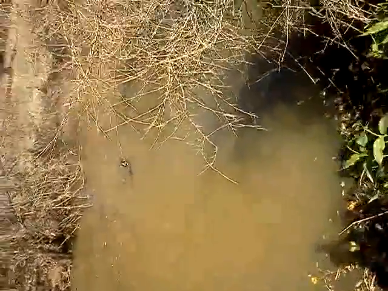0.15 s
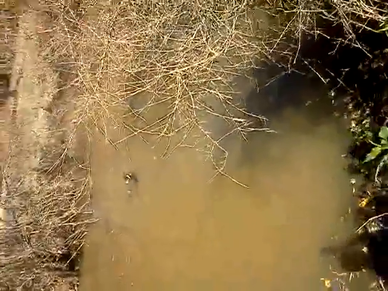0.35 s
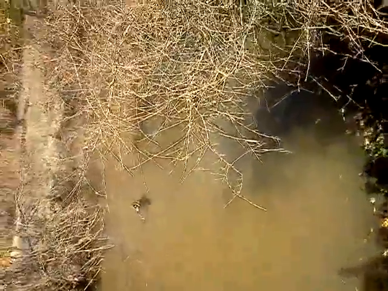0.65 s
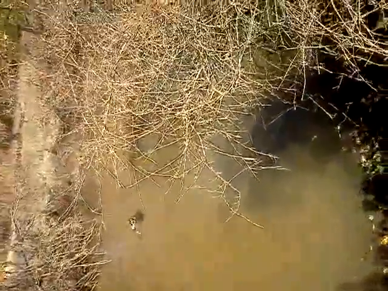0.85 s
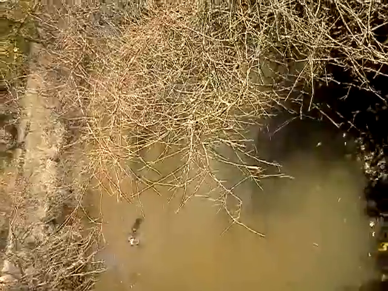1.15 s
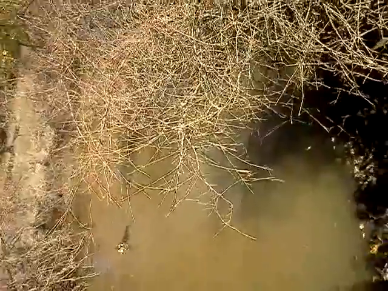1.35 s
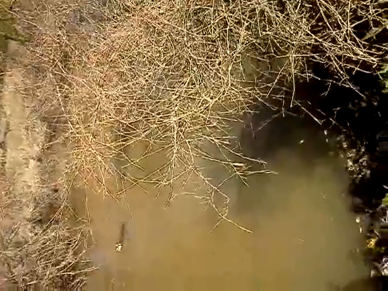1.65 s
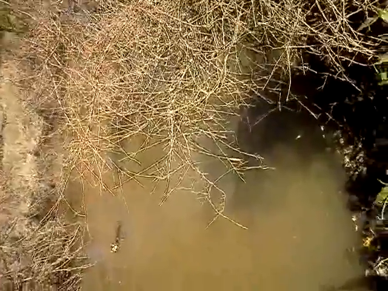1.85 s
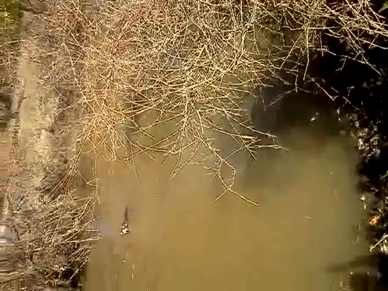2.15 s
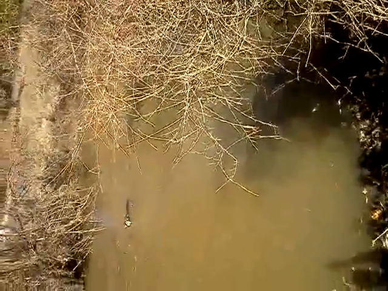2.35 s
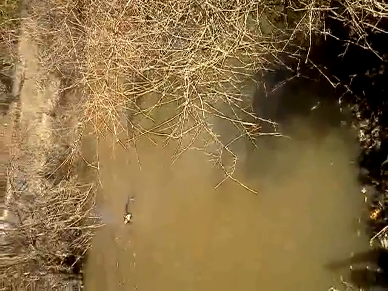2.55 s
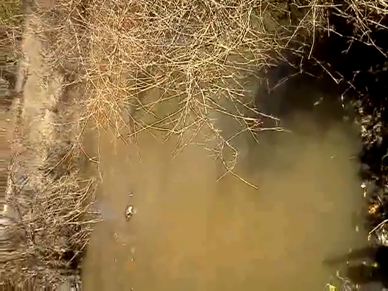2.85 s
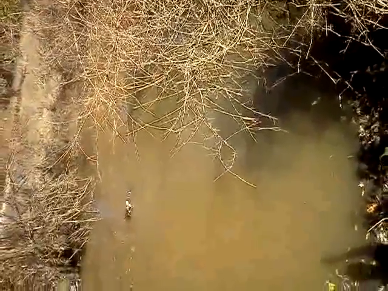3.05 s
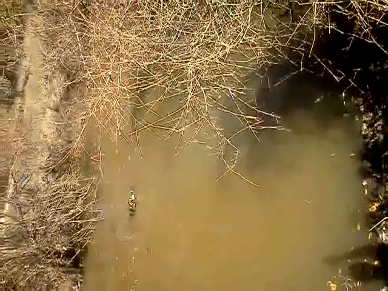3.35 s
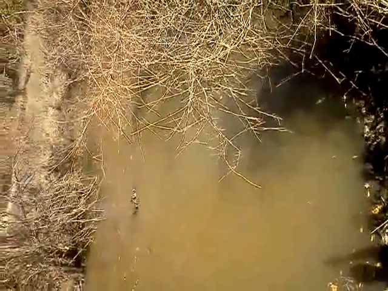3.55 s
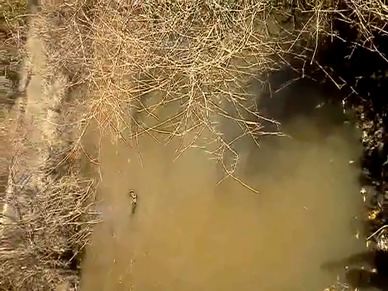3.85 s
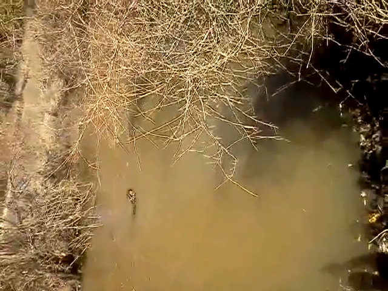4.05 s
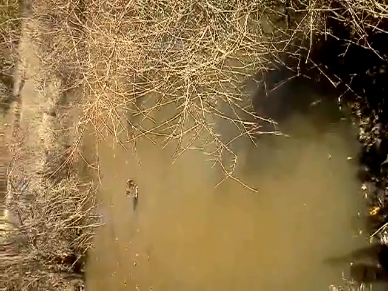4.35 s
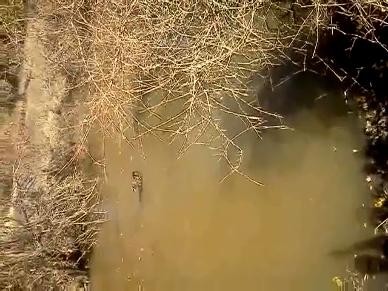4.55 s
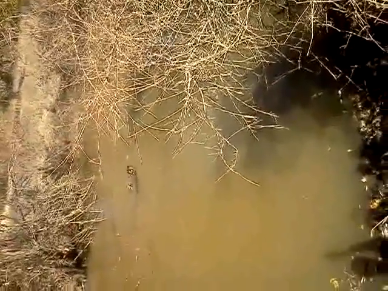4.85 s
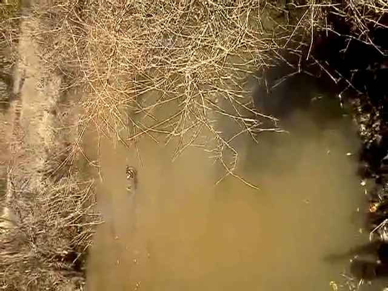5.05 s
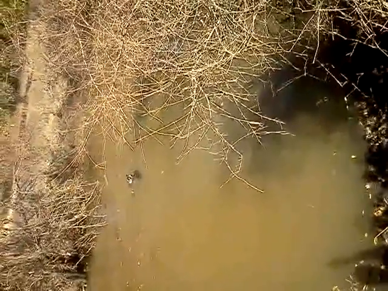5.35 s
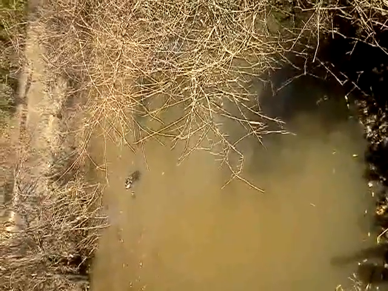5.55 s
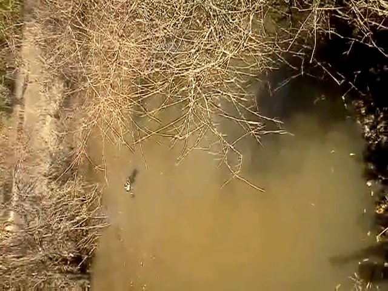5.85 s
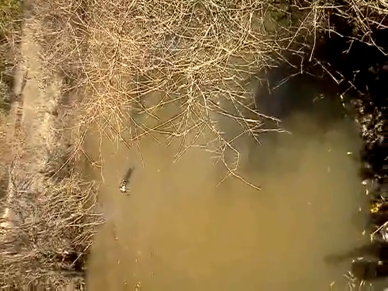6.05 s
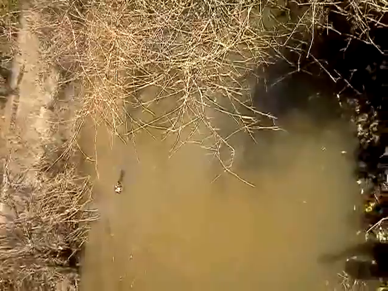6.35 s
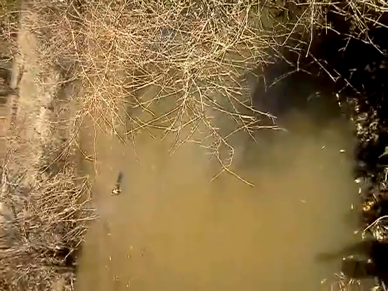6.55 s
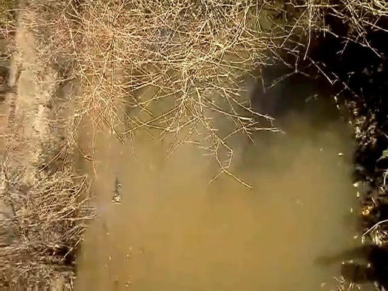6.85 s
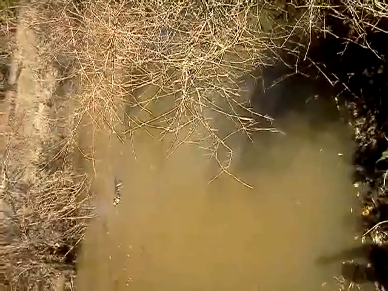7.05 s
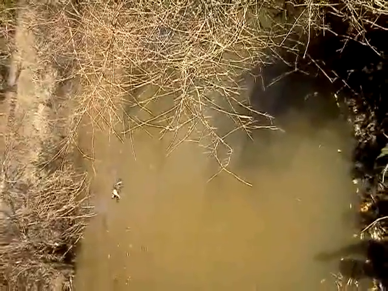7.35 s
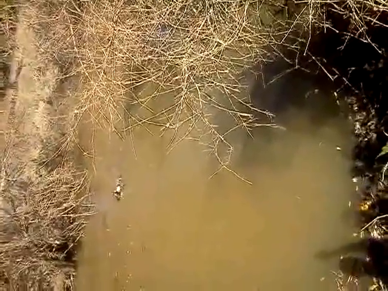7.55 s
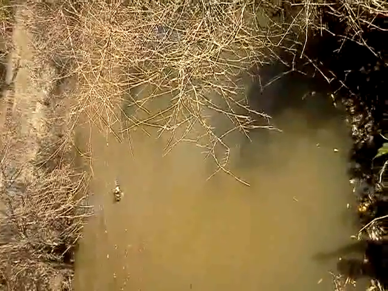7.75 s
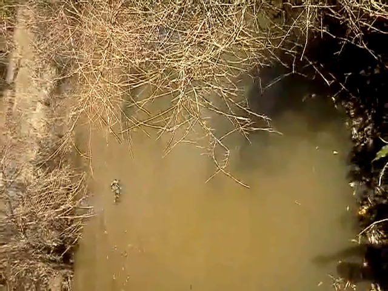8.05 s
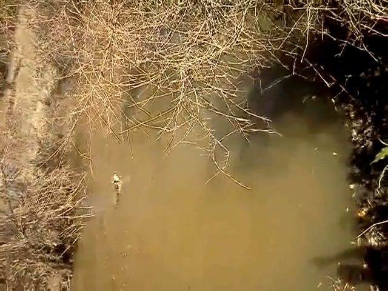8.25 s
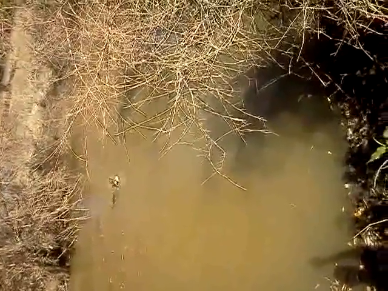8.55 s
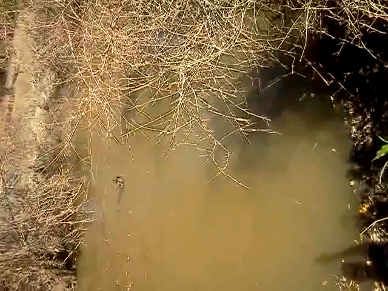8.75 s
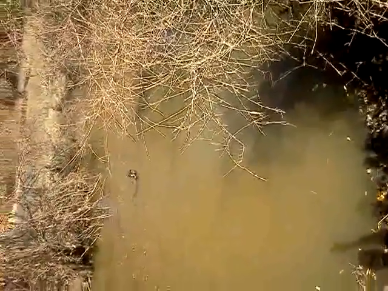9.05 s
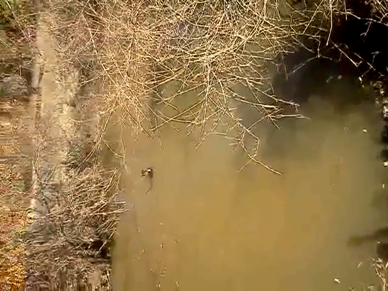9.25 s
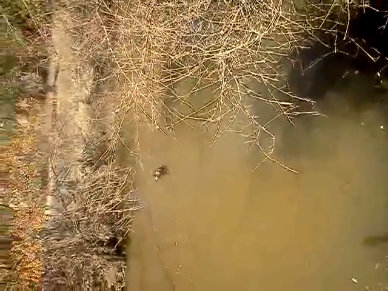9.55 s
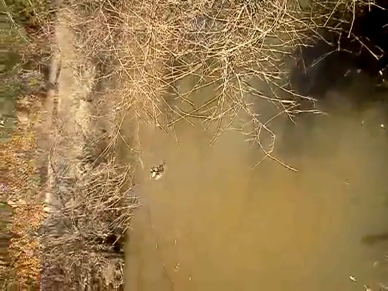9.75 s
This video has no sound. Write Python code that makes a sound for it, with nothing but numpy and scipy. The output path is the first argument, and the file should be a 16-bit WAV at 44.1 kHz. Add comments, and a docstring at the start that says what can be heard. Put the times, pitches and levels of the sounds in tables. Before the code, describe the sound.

Sharp pitched dog yips echo outdoors over a faint creek wash, amid early dry-litter crackle and dull finger bumps on the camera.

```python
"""On the wooded banks above a slow creek, a husky yelps and whines close by, and the banks ring after its cries.
The dog's voice mixes clear vocal-fold tones with torn, noisy rasps, shaped by a mouth that opens and shuts.
Dry twigs snap as short noise bursts, leaves rustle as many tiny cracks, and fingers thump a camera body.
The creek is patchy filtered noise far below. Loud cries are flattened by a fast limiter and rounded clipping."""
import sys
import numpy as np
from scipy import signal
from scipy.fft import rfft, irfft, next_fast_len
from scipy.io import wavfile
from scipy.ndimage import uniform_filter1d

SR = 44100
rng = np.random.default_rng(int(sys.argv[2]) if len(sys.argv) > 2 else 0)


def waveform_to_disk(signal):
    """Save audio, clipped to [-1, 1], as 16-bit WAV at the path in sys.argv[1]."""
    frames = np.transpose(np.atleast_2d(signal))
    scaled = np.clip(frames, -1, 1) * 32767
    samples = np.round(scaled).astype(np.int16)
    wavfile.write(sys.argv[1], SR, samples)


N = 436590
TIME = np.arange(N) / SR  # seconds

# tone colour of breaking dry litter, for twigs and leaves: (f/Hz, level/dB)
TWIG = [(200, -34.5), (700, -17.5), (1400, -3.5), (2600, 2), (3400, -13.5), (5000, -28)]


def gain_of(db):
    """Turns decibels into an amplitude factor."""
    return 10 ** (np.asarray(db) / 20)


def evened(x):
    """Scales a sound to an rms (average strength) of 1."""
    return x / np.sqrt(np.mean(x ** 2) + 1e-20)


def steadied(x, size=500):
    """Holds the short-time rms near 1, averaging twice over size samples."""
    power = uniform_filter1d(uniform_filter1d(x ** 2, size), size)
    return x / np.sqrt(abs(power) + 1e-12)


def read(points, hz):
    """Reads a table between its points, on a logarithmic frequency axis."""
    f, value = np.transpose(points)
    return np.interp(np.log(hz + 1), np.log(f + 1), value)


def coloured(x, points):
    """Changes the tone colour by a table of (f/Hz, level/dB)."""
    size = next_fast_len(len(x) + 2048)
    gain = gain_of(read(points, np.fft.rfftfreq(size, 1 / SR)))
    return irfft(rfft(x, size) * gain, size)[:len(x)]


def wander(size, rate_hz):
    """Smooth random drift of rms 1; changes faster than rate_hz are strongly weakened."""
    hz = np.fft.rfftfreq(size, 1 / SR)
    spectrum = rfft(rng.standard_normal(size)) / (1 + (hz / rate_hz) ** 4)
    return evened(irfft(spectrum, size))


def add(mix, s, sound):
    """Mixes a sound in, starting at s seconds."""
    part = mix[max(round(s * SR), 0):][:len(sound)]
    part += sound[:len(part)]


def step(t, at_s, ease_s):
    """Changes smoothly from 0 to 1 around at_s."""
    return .5 + .5 * np.tanh((t - at_s) / ease_s)


def resonate(x, hz, width_hz):
    """A steep resonance that follows the curve hz: shift its pitch to zero, smooth twice, shift back."""
    turn = np.exp(2j * np.pi * np.cumsum(hz * np.ones(len(x))) / SR)
    r = np.exp(-np.pi * width_hz / SR)
    smooth = signal.lfilter([(1 - r) ** 2], [1, -2 * r, r * r], x / turn + 1e-18)
    return 2 * (turn * smooth).real


def creek(patchy_db=2, swell_db=2.0, level_db=-43):
    """A far wash of water: noise whose strength drifts in patches over time and frequency."""
    # colour of the water: (f/Hz, level/dB)
    water_colour = [(30, -26), (100, -12.5), (220, -7.5), (400, 2.5), (700, -2.5), (1300, -4.5), (2000, 0),
                    (2700, 2), (3400, -10), (4200, -19.5)]
    z = signal.stft(rng.standard_normal(N), nperseg=1024)[2]
    patches = uniform_filter1d(rng.standard_normal(z.shape), size=7, axis=0)  # across frequency
    patches = evened(uniform_filter1d(patches, size=8, axis=1))  # across time
    wash = signal.istft(z * gain_of(patchy_db * patches), nperseg=1024)[1][:N]
    return evened(coloured(wash, water_colour)) * gain_of(level_db + swell_db * wander(N, rate_hz=9.5))


def banks(x, tail_db=-16.0, build_s=0.0086, clumpy_db=3):
    """A few distinct echoes, and the scatter of trunks and branches, which arrives in clumps."""
    # echoes from ground and banks: (delay t/s, level/dB)
    echoes = [(.012, -34), (.041, -15), (.052, -17.5), (.098, -21.5), (.135, -25), (.19, -34), (.26, -35.5)]
    # time in which the scatter falls by 60 dB: (f/Hz, t/s)
    wood_decay = [(250, 0.18), (700, 1.24), (1400, 1.415), (2600, 1.05), (4000, 0.99)]
    # colour of the scatter at its start: (f/Hz, level/dB)
    wood_colour = [(200, -32.5), (750, -2), (1400, 0), (2500, 6.5), (4000, -0.5)]
    t = np.arange(int(1.5 * SR)) / SR
    hz, age, z = signal.stft(rng.standard_normal(len(t)), SR, nperseg=256)
    fading_db = read(wood_colour, hz)[:, None] - 60 * age / read(wood_decay, hz)[:, None]
    tail = signal.istft(z * gain_of(fading_db), SR, nperseg=256)[1][:len(t)]
    tail = tail * (1 - np.exp(-t / build_s))
    tail = tail * gain_of(clumpy_db * wander(len(t), rate_hz=80))
    response = gain_of(tail_db) * tail / np.linalg.norm(tail)
    for delay, db in echoes:
        add(response, delay, gain_of([db]))
    return signal.fftconvolve(x, response)[:N]


def leaves(crackles_per_s=5000, spread_db=4.0, still_db=-70):
    """Many tiny cracks of dry litter, swelling and dying with each scuff and never quite still."""
    # scuffs in the leaves: (loudest at t/s, rise t/s, fall t/s, level/dB)
    scuff_table = [(.12, 0.15, 0.14, -29), (.375, 0.033, 0.026, -48), (.49, 0.014, 0.027, -30.5),
                   (0.751, 0.081, .02, -31), (2.235, 0.043, 0.052, -31.5), (2.3, 0.058, .02, -29)]
    happens = rng.random(N) < crackles_per_s / SR
    sizes = gain_of(spread_db * np.minimum(rng.exponential(1, N), 4))
    grains = happens * rng.standard_normal(N) * sizes
    scuffs = np.zeros(N)
    for s, rise_s, fall_s, db in scuff_table:
        distance = np.maximum((s - TIME) / rise_s, (TIME - s) / fall_s)
        scuffs += gain_of(db) * np.exp(-distance)
    return evened(coloured(grains, TWIG)) * (gain_of(still_db) + scuffs)


def twigs(snap_s=0.0016, splinter_db=-17, splinter_s=0.014):
    """Each dry twig gives a sharp crack of noise with a brief, weaker splintering behind it."""
    # snaps: (t/s, peak level/dB)
    snaps = [(0.1181, -1), (0.123, -19), (.159, -13), (0.179, -28), (0.195, -8), (0.205, -17.5),
             (0.372, -16), (0.407, -23.5), (0.695, -8), (.721, -14), (0.746, -10), (2.151, -13.5),
             (9.836, -11)]
    out, t = np.zeros(N), np.arange(2000) / SR
    fade = np.exp(-t / snap_s) + gain_of(splinter_db) * np.exp(-t / splinter_s)
    for (s, db), noise in zip(snaps, rng.standard_normal((len(snaps), len(t)))):
        crack = coloured(noise * fade, TWIG)
        add(out, s, gain_of(db) * crack / abs(crack).max())
    return out


def thump(hz, rise_s, sag=0.43, sag_s=0.0013):
    """The damped case rings briefly, sagging in pitch as the finger settles."""
    t = np.arange(1500) / SR
    turns = np.cumsum(hz * (0.95 + sag * np.exp(-t / sag_s))) / SR
    return (t / rise_s) * np.exp(1 - t / rise_s) * np.sin(2 * np.pi * turns)


def fingers(rise_s=0.0024, harden=0.024, creak_db=-14, lag_s=.002, count=4, fidgets_per_s=8, fidget_db=-33):
    """Each slip of the grip thumps the case, the harder the shorter; weaker and faint slips fall at random."""
    # bumps, before thump() bends the pitch and the case colours it: (t/s, level/dB, ring f/Hz)
    bumps = [(0.189, -27, 257), (0.353, -28, 206), (1.53, -23.5, 193), (1.788, -32.5, 240),
             (1.95, -28.5, 266), (2.484, -26, 237), (2.541, -14.5, 278), (2.594, -12.5, 326),
             (2.609, -16, 270), (2.646, -16, 279), (2.673, -18.5, 333), (2.783, -31.5, 248),
             (2.961, -26, 240), (3.001, -11.5, 336), (3.05, -16, 269), (3.076, -20, 273),
             (3.663, -14.5, 261), (3.682, -14.5, 294), (3.701, -14, 300), (3.737, -9, 415),
             (3.75, -14.5, 277), (3.821, -15.5, 306), (3.879, -19, 297), (3.9, -14, 352),
             (3.919, -15.5, 316), (3.958, -21.5, 298), (4.037, -15, 363), (4.065, -17, 268),
             (4.507, -19.5, 363), (4.551, -8, 318), (4.633, -18, 230), (4.656, -9.5, 331),
             (4.675, -19.5, 257), (4.791, -13.5, 281), (4.818, -8.5, 313), (4.861, -10, 416),
             (4.877, -22.5, 221), (4.955, -15.5, 324), (5.065, -23, 211)]
    out = np.zeros(N)
    for (s, db, hz), chance in zip(bumps, rng.random((len(bumps), count, 3))):
        add(out, s + lag_s, gain_of(db) * thump(hz, rise_s * np.exp(-harden * (db + 34.5))))
        for when, size, pitch in chance:  # weaker slips just after
            creak = thump(220 + 240 * pitch, rise_s * (1.3 - .7 * pitch))
            add(out, s + 0.00511 + 0.031 * when, gain_of(db + creak_db) * (0.82 + size) * creak)
    for s in np.arange(1.6, 5.25, 1 / fidgets_per_s):  # seconds when the grip is restless
        when, size, pitch = rng.random(3)
        fidget = thump(230 + 90 * pitch, rise_s)
        add(out, s + when / fidgets_per_s, gain_of(fidget_db) * (.5 + size) * fidget)
    # colour of the case: (f/Hz, level/dB)
    return coloured(out, [(60, 0.0), (130, -10.5), (220, 1), (550, -1.0), (900, 3.5), (1500, -14.5)])


def gesture(start, length, swell_s, level_db, change_db, first_hz, turn_hz, last_hz, climb_s,
            opens_s, shuts_s, first_rough, last_rough, shut_db, open_db):
    """One cry: effort swells, holds and lets go, the pitch bends to a turning point, the mouth opens and shuts."""
    # the voice cracks into another register: (t/s, length t/s, pitch ratio)
    cracks = [(1.013, .027, 1.15), (1.361, .05, 1.21), (3.146, .05, 1.1), (4.11, .044, 1.08),
              (5.563, .024, 1.13), (6.646, .038, 1.293), (6.706, 0.0261, 1.09), (7.295, 0.044, 1.2),
              (8.235, 0.018, 1.335), (8.301, 0.016, 0.99)]
    t = np.arange(0, length, 1 / SR)
    # the pitch rounds off towards its turning point, then moves away ever faster
    climb = np.maximum(1 - t / climb_s, 0) ** 1.8
    drop = (np.maximum(t - climb_s, 0) / max(length - climb_s, 1 / SR)) ** 1.6
    hz = turn_hz + (first_hz - turn_hz) * climb + (last_hz - turn_hz) * drop
    change_s, catch_s = 0.00071, 0.0041  # a register changes fast; the voice catches for longer
    catch = 0
    for s, held_s, ratio in cracks:
        hz = hz * ratio ** (step(start + t, s, change_s) - step(start + t, s + held_s, change_s))
        for edge in (s, s + held_s):
            catch = catch + np.exp(-((start + t - edge) / catch_s) ** 2)
    jaw_s = 0.0058
    gape = step(t, opens_s, jaw_s) * (1 - step(t, shuts_s, jaw_s))  # 0 shut, 1 open
    # half way between shut and open the voice tears
    torn = np.sin(np.pi * gape) ** 2
    # the voice catches late in the swell, and effort drops again in the last 21 ms
    onset_db = -18 * np.maximum(1 - (t / swell_s) ** 1.63, 0)
    release_db = -13.5 * np.maximum(1 - (length - t) / 0.021, 0)
    quaver_db = 1.5 * wander(SR, rate_hz=40.4)[:len(t)]  # effort is never quite steady
    effort_db = level_db + change_db * t / length + onset_db + release_db + quaver_db
    # a shut mouth lets less sound out; tears and catches weaken the voice
    effort_db = effort_db - 4 * (1 - gape) - 3 * torn - 0.5 * catch
    # roughness soon settles to its last value; tears and catches add to it
    rough = last_rough + (first_rough - last_rough) * abs(1 - t / length) ** 1.4
    rough = rough + .25 * torn + 0.17 * catch
    # the mouth resonance moves from near the pitch to near its octave
    mouth = hz * (1.176 + (1.985 - 1.176) * gape)
    bright_db = shut_db + (open_db - shut_db) * gape + 4 * torn
    return start + t, hz, effort_db, rough, mouth, bright_db


def throat(drive, mouth, bright_db, width_hz, shift):
    """The moving mouth resonance, with the fixed upper ones added more as the voice brightens."""
    # upper resonances, before shift scales the frequency: (f/Hz, width f/Hz, relative level/dB)
    resonances = [(1935, 420, -4.5), (2525, 452, 3), (2678, 582, 1)]
    upper = 0
    for k, (hz, width, db) in enumerate(resonances):
        upper = upper + (-1) ** k * gain_of(db) * resonate(drive, hz * shift, width)
    lower = steadied(resonate(drive, mouth, width_hz))
    return steadied(lower + gain_of(bright_db) * steadied(upper))


def cry(row, count=7, order=3, lock=1.0, split=0.45, rasp_bright_db=-1.5):
    """Vocal folds swing between a clear tone and a torn rasp, and jump between registers."""
    t, hz, effort_db, rough, mouth, bright_db = gesture(*row)
    rough = np.clip(rough, 0, 1)
    # rough folds lose their timing and beat unevenly
    turns = np.cumsum(hz * (1 + .08 * rough * wander(len(t), rate_hz=170))) / SR
    # with the mouth tuned to the octave the folds lock to it, and the odd partials fade
    near_octave = np.exp(-((mouth / hz - 2) / 0.23) ** 2)
    odd = 1 - min(lock, 1) * near_octave * (1 - rough ** 2)
    folds = sum(odd ** (k % 2) * np.cos(2 * np.pi * k * turns) for k in range(1, count))
    folds = folds * (1 + 0.48 * rough * wander(len(t), rate_hz=1100))
    # strained folds beat strong-weak-weak, which adds lines between the partials
    beat = np.cos(2 * np.pi * turns / order + wander(len(t), rate_hz=27))
    folds = folds * (1 + split * rough * beat)
    # air escapes in one puff a cycle
    puffs = (0.76 + np.exp(-(turns % 1) / 0.28)) * rng.standard_normal(len(t))
    tone = throat(folds, mouth, bright_db, width_hz=690, shift=0.96)
    rasp = throat(puffs, mouth, bright_db + rasp_bright_db, width_hz=900, shift=.92)
    # colour of the rasp: (f/Hz, level/dB)
    rasp = coloured(rasp, [(150, -6), (450, 0.5), (750, 7.5), (1100, -0.5), (1800, 7.5), (2500, 6), (3000, 5.5)])
    voice = steadied((1 - rough) * tone + .75 * rough * rasp)
    fade = np.clip(np.minimum(t - t[0], t[-1] - t) / 0.0022, 0, 1)  # avoids clicks at both ends
    return t[0], gain_of(effort_db) * voice * fade


def husky():
    """The dog's vocal folds, throat and mouth sound one cry after another."""
    # cries, before cracks, tears and unsteadiness change them: (start t/s, length t/s, swell t/s,
    # effort level/dB, change of effort level/dB, first f/Hz, turning f/Hz, last f/Hz, time to turning t/s,
    # mouth opens after t/s, mouth shuts after t/s, first roughness 0-1, last roughness 0-1,
    # brightness shut level/dB, brightness open level/dB)
    cries = [ (0.447, 0.4, 0.019, -36.5, -2, 386.4, 392.5, 391, 0.087, .4, .5, 0.53, 0.4, -22, -10),
             (0.759, 0.14, 0.019, -3.5, 6, 603.6, 745, 723, 0.095, .032, .107, .75, 0.16, -7.5, -11.5),
             (0.984, 0.17, 0.048, -3, 8.5, 363.2, 808, 628, .12, 0.0539, 0.15, 0.2, 0.13, -3.5, -27),
             (1.15, 0.12, 0.0049, -21, 4, 505, 355, 506, 0.035, .15, .19, .2, 0.37, 0.5, -6),
             (1.223, 0.098, 0.0363, -6, 2, 460.4, 645, 635, .075, 0.029, .13, 0.44, .2, -2, -2.5),
             (1.311, .092, 0.013, -5, -3, 653, 689, 506, .022, 0.0008, 0.0509, .15, 0.39, -5.5, 1),
             (3.083, .11, 0.0099, -7, 12, 735.7, 822, 636, 0.063, 0.012, 0.0695, 0.63, 0.21, -5, -2),
             (4.082, 0.14, .019, 3.5, -7.5, 622.6, 771, 665, 0.059, 0.057, .093, .55, 0.19, -3.5, -22),
             (4.269, 0.058, 0.013, -11, -1, 420, 508.5, 510, 0.048, .09, .12, 0.33, 0.42, -13, -14),
             (4.298, 0.1504, 0.023, -6.5, 5, 510, 734.3, 700, .1, 0.0021, .115, 0.37, 0.39, -7, -17.5),
             (5.456, 0.032, .006, -27.5, 7, 503, 583, 570, 0.02, .09, .12, 0.3, 0.5, -6, -4),
             (5.477, .127, .015, 1, 1.5, 613, 720, 655, 0.07, .012, .093, 0.88, .14, -9.5, -4),
             (6.651, .144, 0.0088, -1, -1.5, 628.5, 767.4, 672.4, 0.03, 0.0312, 0.12, 0.1, 0.33, -4.5, -10),
             (6.797, 0.078, 0.006, -19.5, 12.5, 582.7, 563, 528, 0.042, 0.0055, .1, 0.8, 0.31, -4, -1.5),
             (7.296, 0.099, .014, 1, -11, 400.2, 672.5, 637, .042, 0.0506, 0.0783, 0.1, 0.31, -14, 4),
             (8.184, 0.14, .021, -8, 7, 516.6, 652.6, 673, 0.11, .018, .117, 0.63, 0.03, -13, -7.5),
             (9.539, .227, 0.077, -11, -5.5, 430.8, 555, 495, .14, 0.0011, .27, 0.45, 0.4, -24, -5),
             (9.865, 0.069, 0.013, -10.5, -7, 356, 509, 510, 0.046, .09, .12, 0.17, 0.3, -14, -25), ]
    out = np.zeros(N)
    for row in cries:
        add(out, *cry(row))
    return out


def scene():
    """The dog and the litter sound between the banks; the bumps come through the case, without echoes."""
    near = husky() + twigs() + leaves()
    return (near + banks(near) + fingers() + creek())[None]


def record(dry, limit_db=-4.0, recovery_db_per_s=130, ceiling=0.75, knee=14, edge_hz=15850):
    """A dull tone with little above 5 kHz, a fast limiter, rounded clipping of the rest, a treble cut-off."""
    # overall tone colour before limiting and clipping: (f/Hz, level/dB)
    tone_colour = [(20, -1.5), (150, 5.5), (400, 2), (2800, -2.5), (3400, 1), (4000, -9.5), (4700, -9.5),
                   (5300, -62), (8000, -87)]
    x = coloured(dry[0], tone_colour)
    # the limiter listens to the fourth power, so spiky rasps are pushed down further than clear tones
    level_db = 5 * np.log10(abs(uniform_filter1d(x ** 4, size=200)) + 1e-12)
    # it follows rises at once and lets go at a steady rate
    fall_db = TIME * recovery_db_per_s
    held_db = np.maximum.accumulate(level_db + fall_db) - fall_db
    over_db = np.maximum(held_db - limit_db, 0)
    x = x / gain_of(0.99 * uniform_filter1d(over_db, size=150))
    x = x / (1 + abs(x / ceiling) ** knee) ** (1 / knee)
    low_pass = signal.firwin(511, edge_hz, window=("kaiser", 9), fs=SR)
    return signal.oaconvolve(x, low_pass, "same")[None]


dry = scene()
out = record(dry)
waveform_to_disk(out)
```